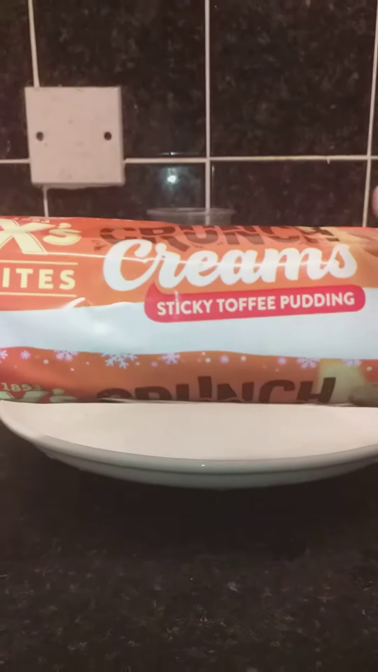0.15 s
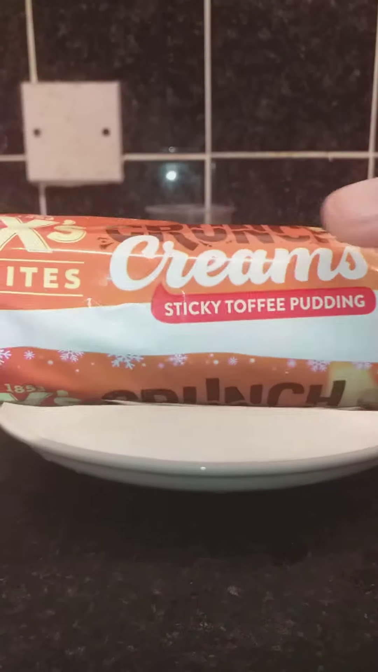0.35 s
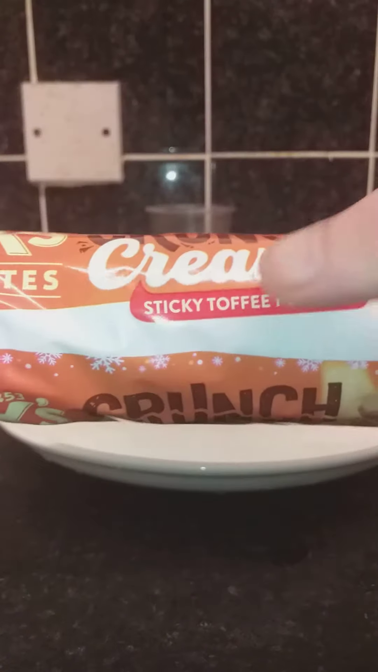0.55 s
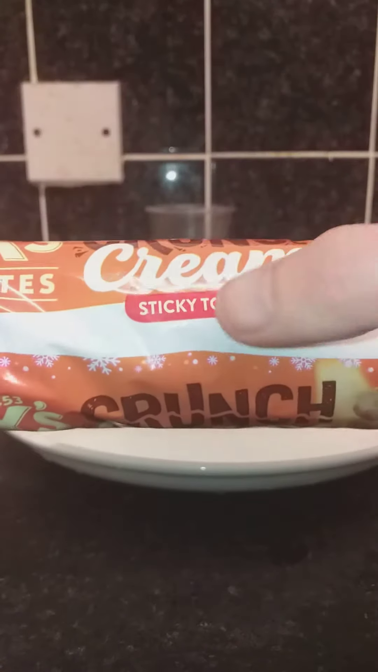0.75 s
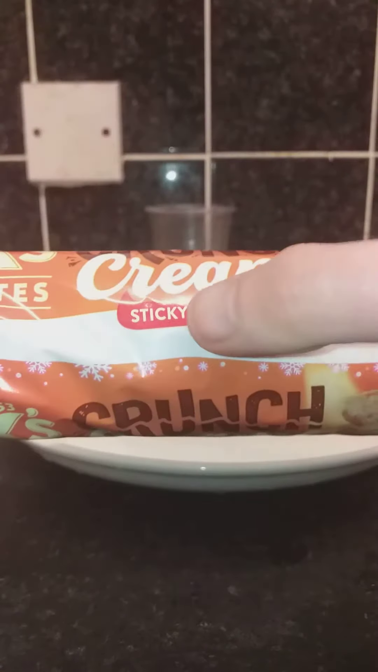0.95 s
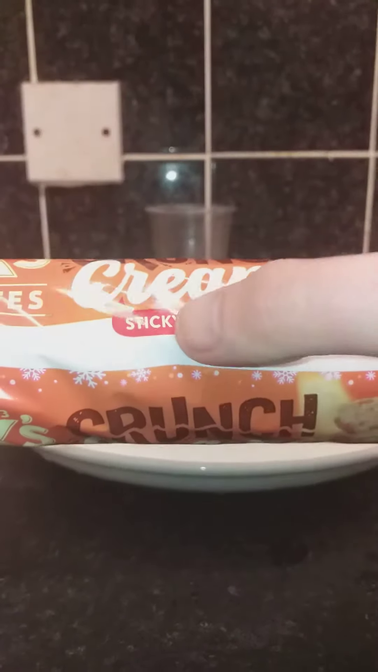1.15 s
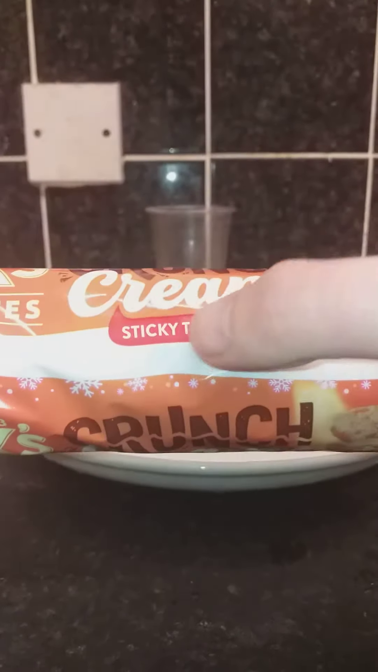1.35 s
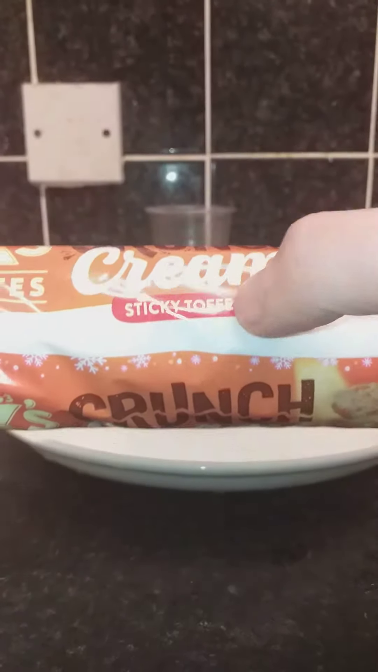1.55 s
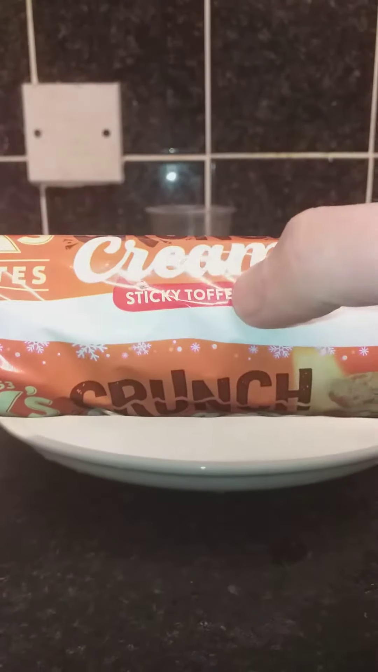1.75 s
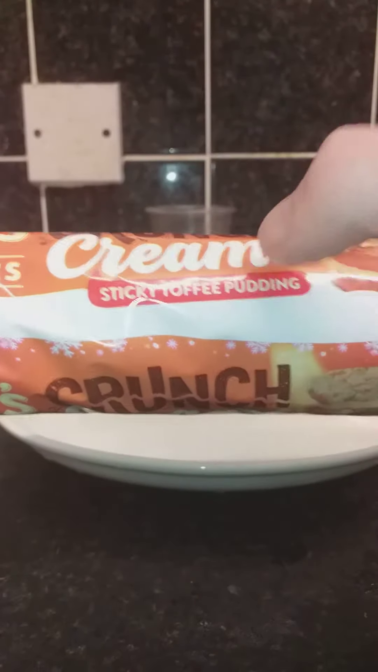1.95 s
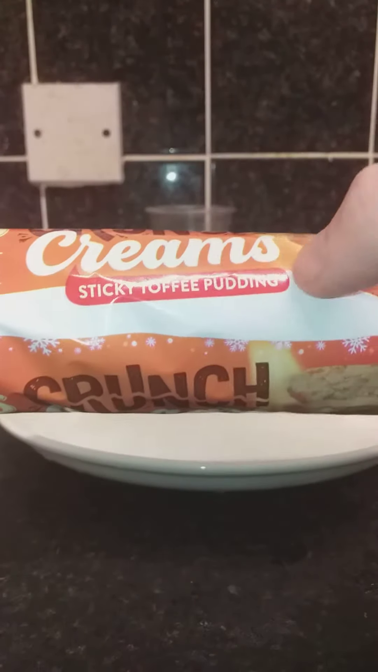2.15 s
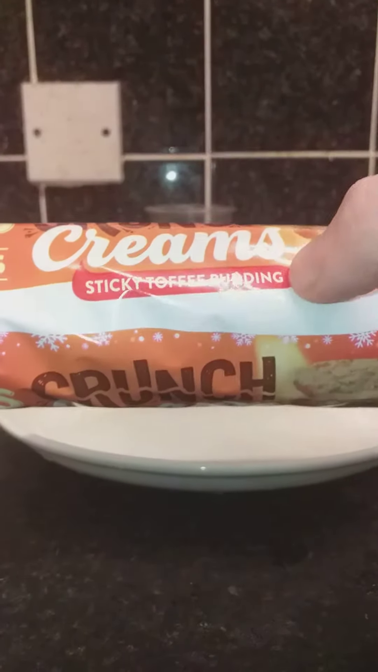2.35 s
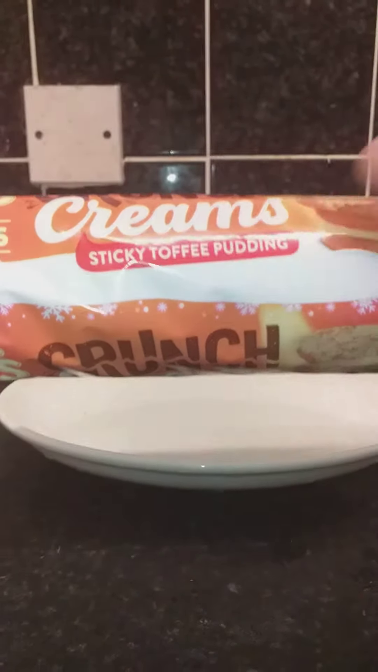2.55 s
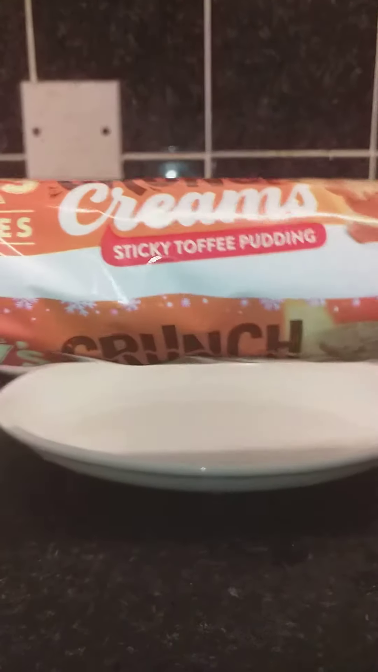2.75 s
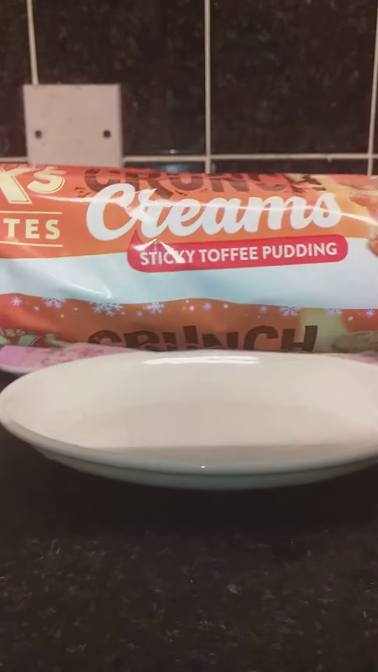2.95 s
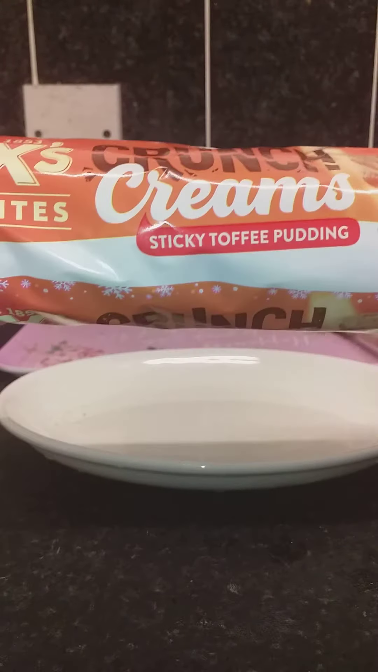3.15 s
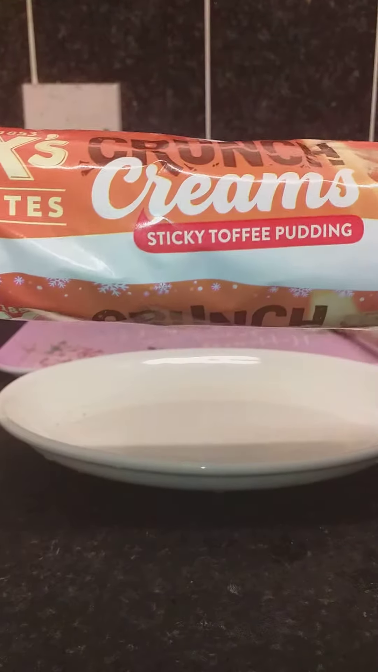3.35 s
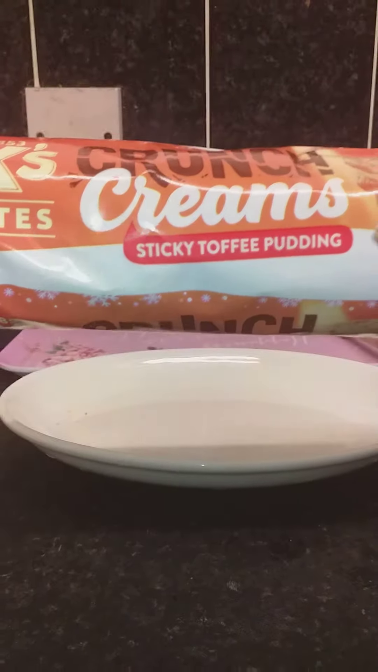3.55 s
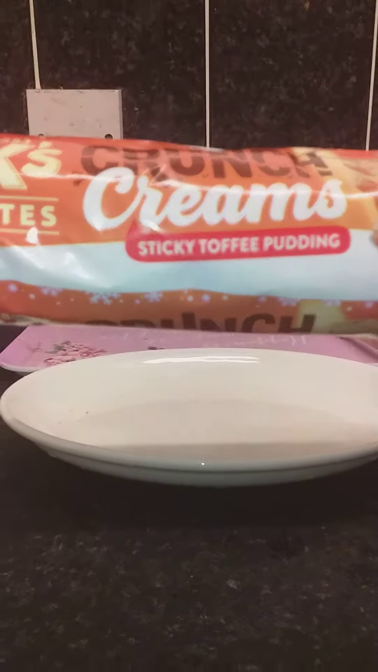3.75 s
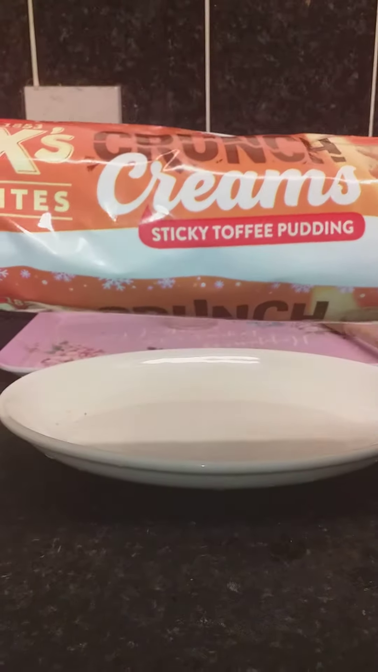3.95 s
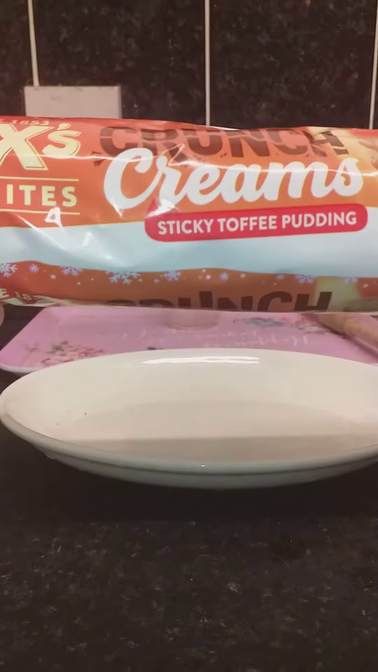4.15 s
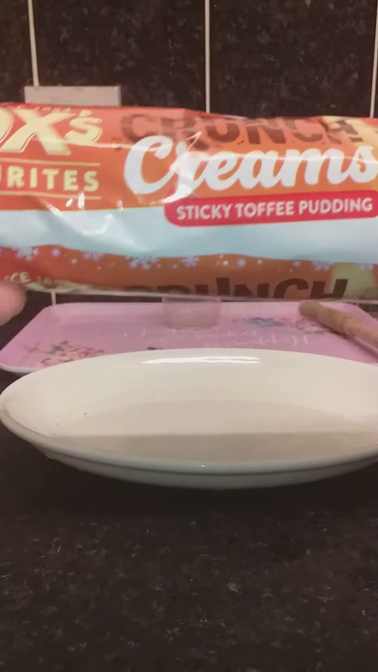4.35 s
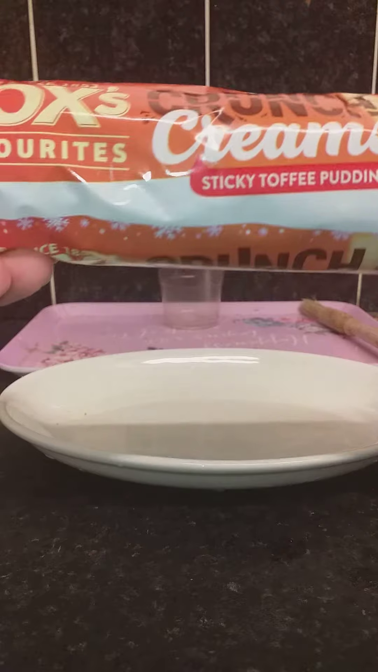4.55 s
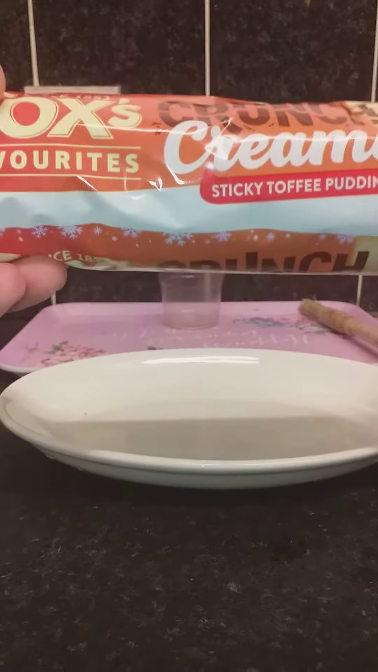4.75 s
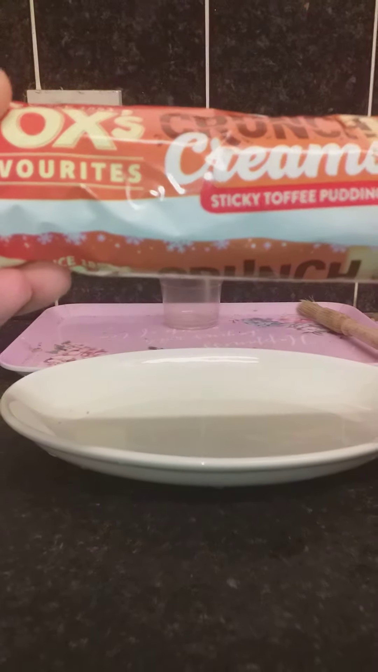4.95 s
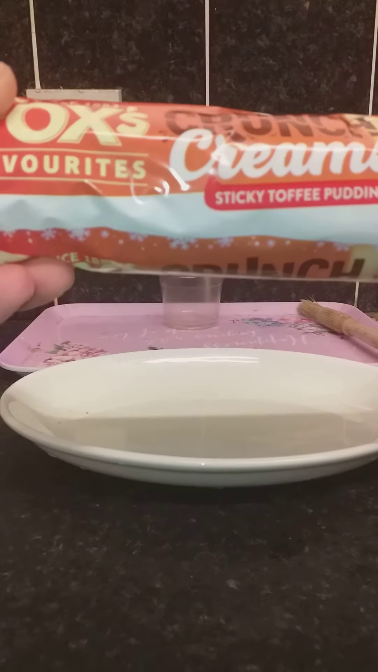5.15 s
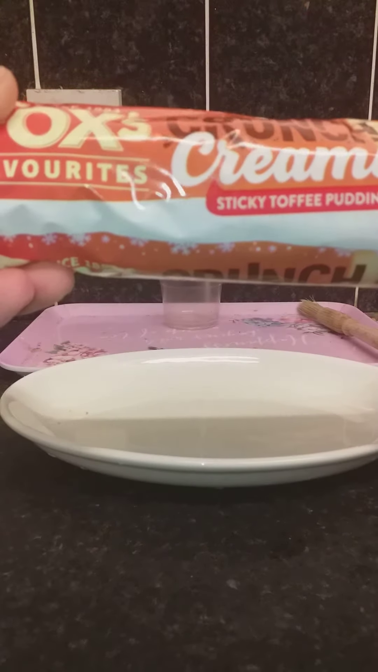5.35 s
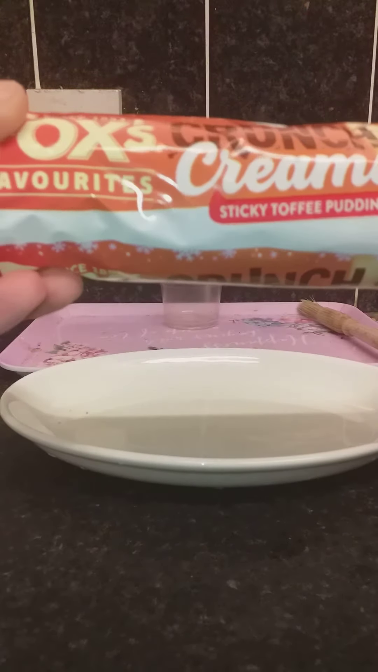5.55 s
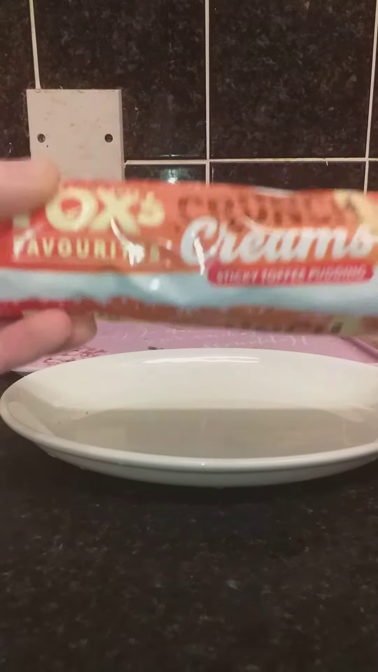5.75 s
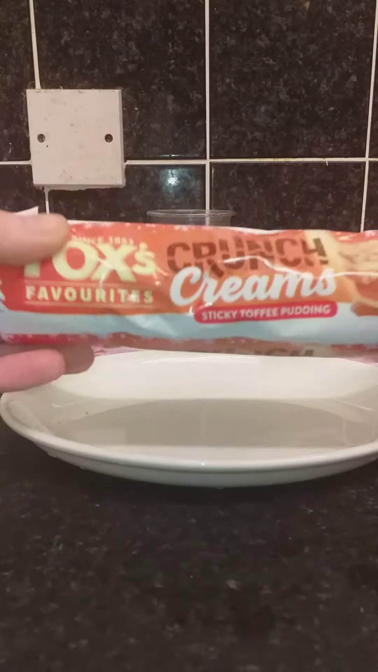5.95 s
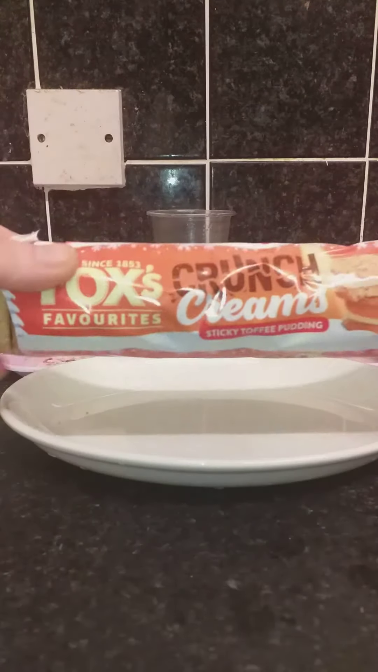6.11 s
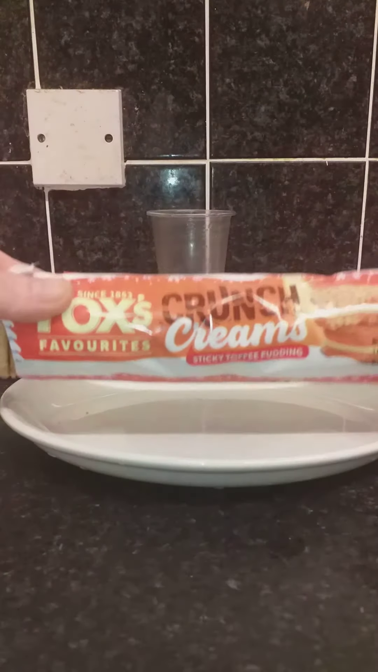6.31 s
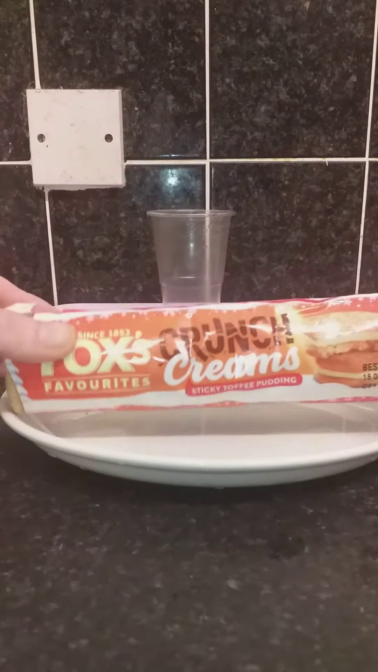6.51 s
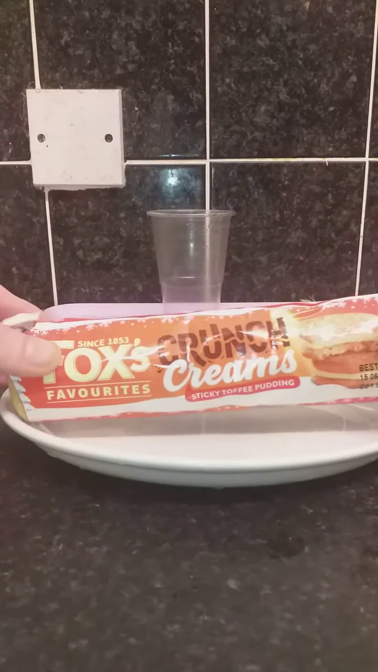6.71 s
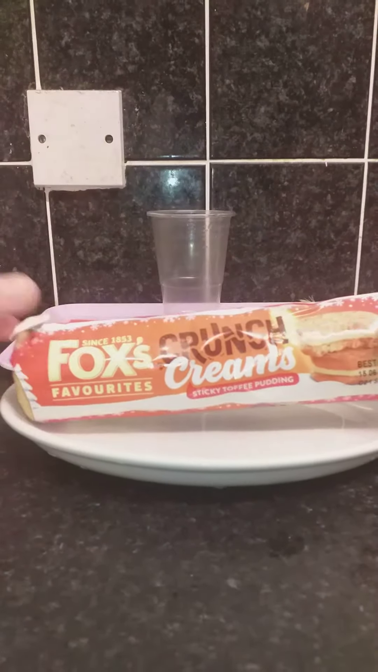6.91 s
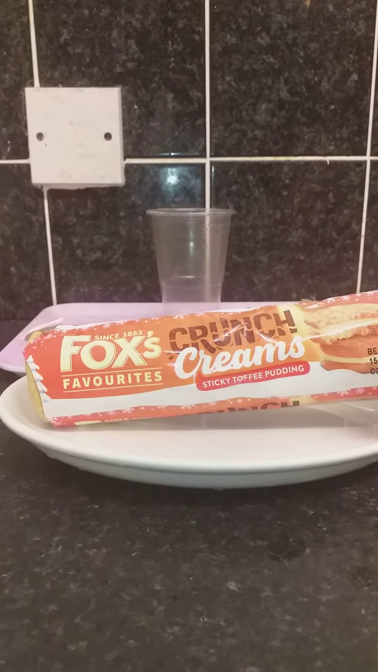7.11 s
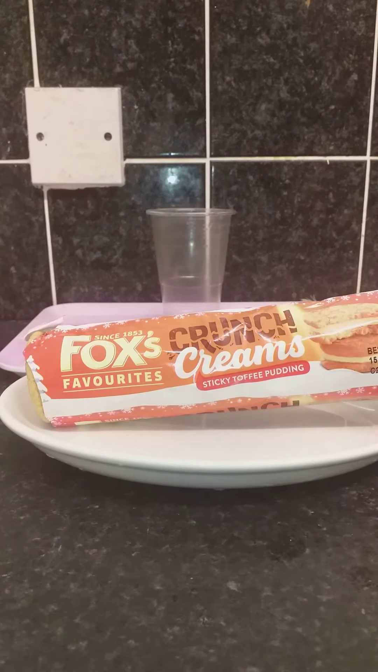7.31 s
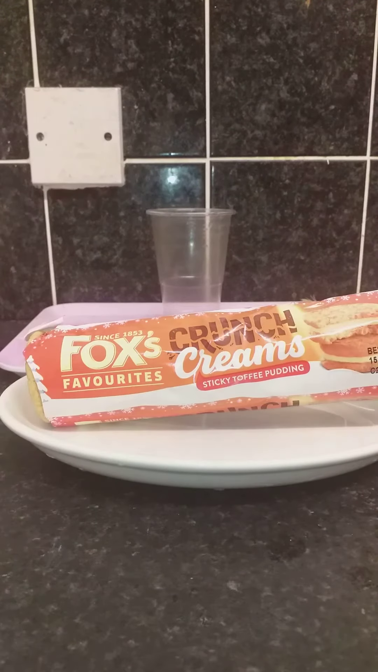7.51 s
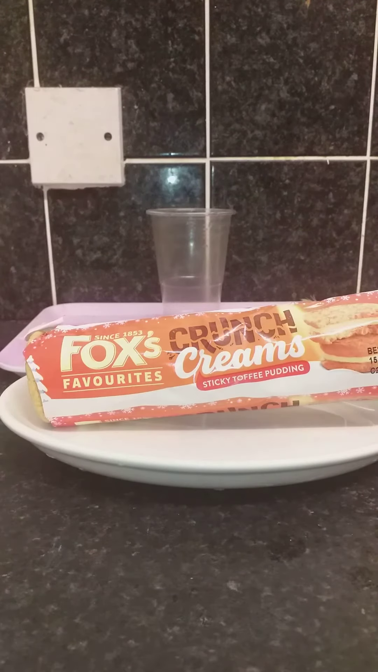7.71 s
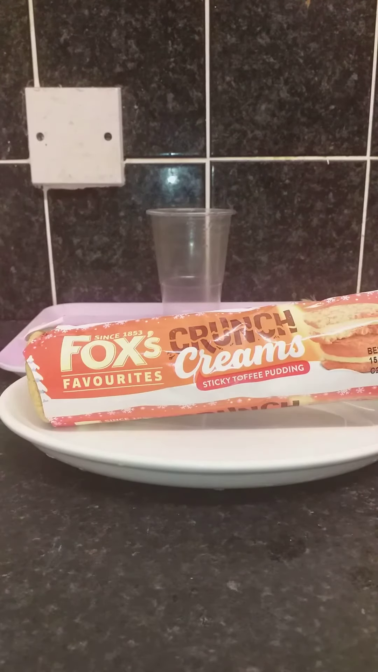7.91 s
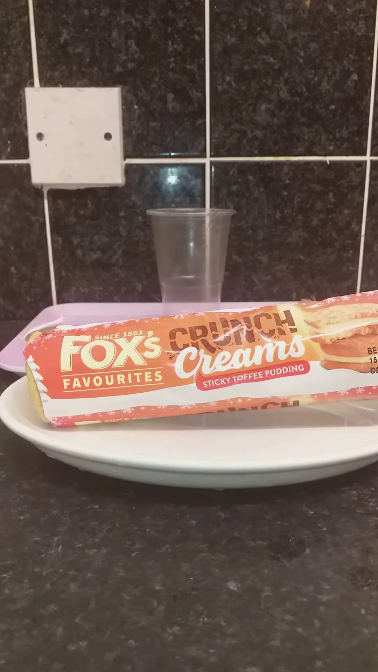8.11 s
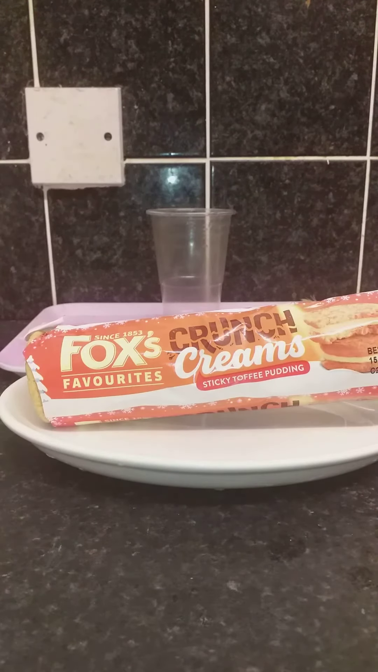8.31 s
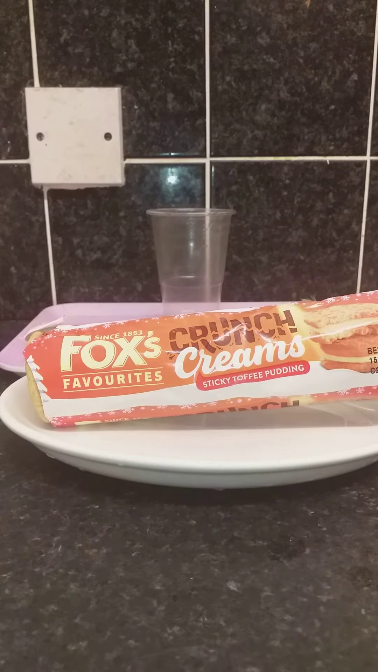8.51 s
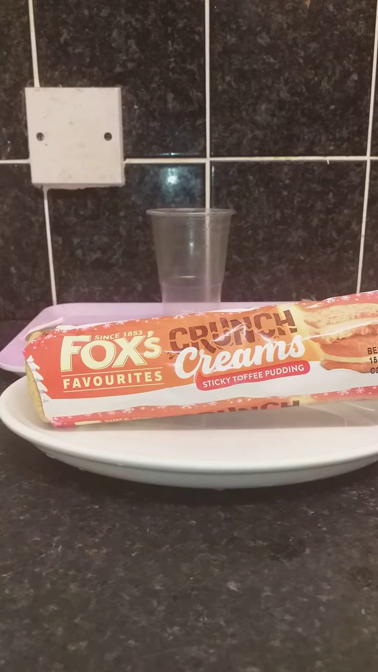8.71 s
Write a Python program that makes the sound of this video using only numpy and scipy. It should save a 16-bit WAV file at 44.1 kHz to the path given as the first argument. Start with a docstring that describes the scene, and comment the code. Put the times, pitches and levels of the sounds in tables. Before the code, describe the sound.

Irregular bursts of bright, snappy wrapper crinkling over a quiet steady motor hum. Isolated creases pop between near-silent gaps, with one tiny thin squeak; later the film crackles thickly and soft low knocks mark the packet landing on a plate. A short hard-walled room ring follows the snaps. The end is almost only hum.

```python
"""In a small tiled kitchen, a thin plastic packet is handled near a phone while an appliance hums.
Each crease of the film snaps over in a short click: film ring, lower packet thud and treble tick.
Wisps of noise crackle between the snaps; soft knocks are pairs of low rings; one thin squeak is a sine.
The tiles ring on as a fading noise tail. The hum is three motor tones over filtered air noise."""
import sys
import numpy as np
from scipy import signal
from scipy.fft import rfft, irfft
from scipy.io import wavfile
from scipy.ndimage import uniform_filter1d

SR = 44100
rng = np.random.default_rng(int(sys.argv[2]) if len(sys.argv) > 2 else 0)


def transcribe(signal):
    """Save signal, clipped to [-1, 1], as a 16-bit WAV file at the path in sys.argv[1]."""
    frames = np.atleast_2d(signal).T
    limited = np.clip(frames, -1, 1)
    pcm = np.round(limited * 32767).astype(np.int16)
    wavfile.write(sys.argv[1], SR, pcm)


N = 391151

# background level, heard to dip and recover slowly: (time [s], relative level [dB])
BACKGROUND_LEVEL = [(0.0, -53.5), (0.62, -59.5), (1.06, -58), (1.7, -53), (2.25, -53.5), (2.47, -51),
                    (2.76, -50.5), (3.33, -54.5), (5.04, -50), (6.91, -52), (7.09, -50), (7.58, -51.5),
                    (8.05, -51.5), (8.87, -49)]
# motor tones in the drone: (frequency [Hz], relative level [dB])
MOTOR_TONES = [(70, -19.5), (100, -6), (129.2, 0)]
# colour of the air noise: (frequency [Hz], relative level per Hz [dB])
AIR_COLOUR = [(24, -45), (45, -22), (80, -17), (150, -10.5), (240, -19), (560, -17), (1300, -9.5),
              (2200, -13.5), (2900, -17.5), (6000, -18), (7200, -38.5), (8800, -54), (11500, -42),
              (16000, -40.5)]
# resonances of the room in the air noise: (centre [Hz], width [Hz], height [dB])
AIR_RESONANCES = [(298, 16.6, 12.5), (366.8, 55, 12.5), (707.3, 15, 11), (752.6, 13.3, 12.5), (1250, 51, 8),
                  (1720, 22, 8), (2133, 25, 8)]
# handling of the film, one curve per spell: (time [s], firmness [dB])
HANDLING_SPELLS = [
    [(0.0, -35.5), (0.114, -49), (0.2, -50)],
    [(0.3, -48), (0.37, -43), (0.44, -53), (0.592, -53), (0.7, -79)],
    [(1.05, -70), (1.146, -39.5), (1.286, -61), (1.6, -61)],
    [(2.1, -70), (2.226, -59), (2.614, -54), (2.76, -44), (2.822, -41.5), (3.022, -52.5), (3.3, -57)],
    [(3.5, -60.5), (3.8, -86)],
    [(4.1, -62), (4.4, -59)],
    [(5.46, -34.5), (5.52, -39), (5.658, -37.5), (5.76, -30), (5.86, -36), (5.98, -31), (6.1, -41.5),
     (6.26, -51)],
    [(6.35, -38), (6.44, -37.5), (6.53, -25.5), (6.62, -42), (6.75, -46), (6.8, -54), (6.88, -45),
     (6.98, -32), (7.03, -42), (7.12, -42), (7.25, -49)],
    [(7.78, -46.5), (8.0, -57)],
]
# colour of the fine crackle: (frequency [Hz], relative level per Hz [dB])
CRACKLE_COLOUR = [(200, -21), (400, -14.5), (1200, 0), (2600, -1), (4000, -2.5), (5800, 0), (7200, -12),
                  (8800, -27.5), (11000, -16), (15500, -25)]
# the distinct creases, plus a few quieter repeats that the walls return some ms after a loud click: (time [s],
# relative peak [dB], film ring [Hz], packet ring [Hz], # packet relative to film [dB], treble tick relative to
# film [dB])
DISTINCT_CREASES = [(0.0254, -2.5, 5100, 2280, -50, -31), (0.0434, -14.5, 4870, 1370, -30, -12),
                    (0.0524, -16, 5630, 1360, -26, -13), (0.0785, -12.5, 5500, 1090, -20, -17),
                    (0.0905, -11, 3750, 2290, -6.5, -15), (0.3044, -39, 4200, 1780, -4, -7),
                    (0.3138, -17.5, 4230, 1110, -10, -11), (0.33, -30, 5430, 746, -11, -14),
                    (0.3421, -24, 5830, 2300, -19, -15), (0.351, -30, 5660, 1770, -6, -4),
                    (0.4137, -26, 3560, 816, -11, -28), (0.426, -26.5, 4010, 2300, -3, -18),
                    (0.4345, -16.5, 3850, 900, -11, -17), (0.4781, -26, 4220, 2250, -2.5, -22),
                    (0.5027, -27, 5200, 1200, -22, -9), (0.5423, -25.5, 4270, 1410, -14, -29),
                    (1.1019, -28.5, 5500, 700, -11, -14), (1.1248, -11, 5330, 1800, -14.5, -8),
                    (1.128, -20, 5330, 2260, -13, -26), (1.1337, -24, 4190, 974, -7, -19),
                    (1.1466, -17.5, 4110, 1390, -10.5, -27), (1.1574, -30, 4700, 799, -14, -31),
                    (1.2156, -35, 5290, 1890, -11, -31), (1.2418, -19.5, 4050, 1430, -15.5, -45),
                    (1.295, -32, 3810, 633, -5.5, -24), (1.3157, -12.5, 5660, 1400, -8.5, -42),
                    (1.4183, -24, 3900, 670, 2, -39), (1.4248, -31, 3910, 1870, -3, -29),
                    (1.4565, -34, 4290, 1270, -11, -25), (1.5185, -25, 4180, 1260, -7.5, -31),
                    (1.6003, -30, 5700, 1180, -12, -29), (1.8365, -28.5, 3930, 1140, -4, -32),
                    (2.2102, -16, 5000, 1540, -14.5, -24), (2.4046, -28.5, 5060, 743, -5, -40),
                    (2.6005, -26, 5400, 1150, -25, -27), (2.6244, -26, 5270, 697, -16, -11),
                    (2.6672, -16, 4880, 1850, -30, -34), (2.6756, -19, 3650, 2190, -21, -24),
                    (2.6926, -7, 5400, 1740, -26, -19.5), (2.7646, -21.5, 5590, 1250, -23, -18),
                    (2.7778, -19, 3860, 1260, -24, -8), (2.8689, 1.5, 5340, 1850, -19, -13.5),
                    (2.878, -16.5, 4600, 1980, -13, -25), (2.8864, -20, 4800, 1700, -20, -28),
                    (3.0917, -33, 5980, 1250, -9, -29), (3.2148, -24, 5300, 1200, -8, -20),
                    (3.5459, -11, 3970, 800, -13, -24), (3.5669, -17, 4370, 710, -10.5, -35),
                    (3.5974, -25.5, 5370, 710, -2, -36), (3.658, -15, 3540, 980, -7.5, -52),
                    (4.151, -18, 5140, 1820, -22, -38), (4.171, -10, 4970, 1820, -18.5, -17),
                    (4.3286, -32.5, 3660, 1360, -8, -38), (5.462, -12.5, 3800, 1900, -6.5, -24),
                    (5.4787, -16, 5400, 1270, -10, -31), (5.4984, -22, 3790, 853, -2.5, -33),
                    (5.5436, -9, 3980, 1340, -23, -26), (5.5859, -8.5, 5670, 2020, -36, -12),
                    (5.6184, -13.5, 4020, 810, -15, -38), (5.6406, -24, 5380, 1410, -18, -31),
                    (5.6695, -25, 4240, 1190, -7, -29), (5.696, -26.5, 5300, 1590, 4, -18),
                    (5.7288, -3.5, 4060, 2060, -10, -10), (5.7429, -6.5, 4000, 1700, -17, -33),
                    (5.7555, -12, 4350, 2230, -7.5, -25), (5.7767, -17, 5410, 1240, -11, -29),
                    (5.7922, -23, 3850, 824, -14, -31), (5.8102, -11, 3960, 730, -11, -28),
                    (5.84, -19, 5300, 2150, -24, -29), (5.8461, -5, 3970, 1140, -16, -37),
                    (5.8784, -26, 3700, 1100, -21, -25), (5.9063, -11, 4030, 1210, -14, -7),
                    (5.9176, -5, 4430, 1670, -17, -14), (5.9334, -23, 5010, 1700, -9, -24),
                    (5.9458, -10, 4150, 1670, -8, -34), (5.9602, -12.5, 4300, 1040, -21, -21),
                    (5.978, -16, 5630, 2150, -27, -13), (5.997, -19.5, 4010, 2240, -24, -5),
                    (6.0347, -5, 3700, 1740, -13.5, -16.5), (6.0566, -18, 3800, 1720, -13, -25),
                    (6.0804, -24, 4930, 1280, -17, -23), (6.1525, -19, 4200, 1390, -19, -14),
                    (6.2038, -7.5, 5550, 1410, -28, -11), (6.2532, -25.5, 4430, 756, -4, -32),
                    (6.3445, -29, 6000, 1220, -22, -29), (6.3565, -17, 4170, 1840, -13, -28),
                    (6.3614, -7, 3750, 1900, -12.5, -21), (6.3789, 0.5, 4070, 1830, -16.5, -11),
                    (6.415, -5.5, 4460, 2240, -32, -9), (6.4587, -19, 5150, 1170, -21, -27),
                    (6.478, -17, 5440, 1430, -21, -28), (6.4883, -15.5, 4440, 1440, -21, -25),
                    (6.5194, -16, 4480, 1880, -20, -23), (6.5309, -9, 5400, 1140, -15, -7),
                    (6.5438, -8, 4540, 1710, -22, -10), (6.572, -17, 5220, 1140, -11, -30),
                    (6.6713, -24.5, 4500, 1410, -21, -8), (6.7047, -14.5, 5170, 760, -18, -33),
                    (6.731, -20, 4440, 1400, -3, -27), (6.8186, -10.5, 4060, 1700, -17, -43),
                    (6.8448, -21, 4210, 1250, -14, -40), (6.8847, -24, 3400, 1890, -5, -34),
                    (6.9089, -7.5, 4370, 1340, -25, -13), (6.9143, -9.5, 5870, 1850, -14.5, -3),
                    (6.9372, -12, 5730, 1980, -20, -17), (6.9684, -12.5, 4340, 1930, -23, -1),
                    (6.9727, -8.5, 4500, 1430, -20, -14), (6.9769, -6, 4580, 1440, -13, -22),
                    (7.0515, -16.5, 5550, 1870, -9.5, -13), (7.0718, -24, 4580, 1430, -8, -6),
                    (7.1104, -14.5, 5740, 1880, -28, -12), (7.1478, -5, 4670, 1380, -39, -12),
                    (7.8026, -29, 3770, 900, -7, -35)]
# bands that film, packet and edge radiate: (from [Hz], to [Hz], filter order)
RADIATED_BANDS = [(2300, 7100, 5), (280, 2700, 1), (9600, 18000, 3)]
# soft knocks of the full packet in the hand and on the dish:
# (time [s], relative level [dB], low ring [Hz], high ring [Hz])
KNOCKS = [(.578, -43, 620, 940), (4.328, -37.5, 433, 684), (6.485, -37, 210, 452), (6.547, -38, 190, 327.5),
          (6.969, -36, 231, 437), (7.804, -37.5, 119, 389), (7.818, -36.5, 330, 900)]
# the one thin squeak: (start [s], end [s], frequency [Hz], relative level [dB])
SQUEAK_TONE = (2.73, 2.805, 1255, -40)
# the room's fading tail: (frequency [Hz], time to fall 60 dB [s], relative level [dB])
ROOM_TAIL = [(500, 0.52, -2), (1510, 0.13, -4), (4000, 0.28, -1), (8000, 0.27, 0), (16000, 0.15, 7.5)]

CRACKLE_DB = -5.5  # fine crackle relative to the handling
# lesser creases come at random, each with its own rings and colour
LESSER_PER_S = 45
FIRM_DB = -35  # level of firm handling
# relative peak under firm handling; dB per dB of handling; random spread up or down
LESSER_DB, LESSER_SLOPE, LESSER_SPREAD_DB = -28, 1.14, 8
FILM_HZ, PACKET_HZ = (4060, 5940), (1060, 2160)  # ranges of their rings
PACKET_DB, TICK_DB, COLOUR_SPREAD_DB = -5.5, -8.5, 3.5  # relative to the film; random spread
TOP_HZ = 15800  # the phone passes almost nothing above this


def undb(db):
    """Turn decibels into a plain factor."""
    return 10 ** (np.asarray(db) / 20)


def curve(rows):
    """Join (time, value) points by straight lines, one value per sample."""
    times, values = np.transpose(rows)
    return np.interp(np.arange(N) / SR, times, values)


def unit(x):
    """Scale a sound to an average (RMS) strength of 1."""
    return x / np.sqrt(np.mean(x ** 2))


def colour(x, points, peaks=()):
    """Filter with the gain of (Hz, dB) points plus resonant humps, responding only after its input."""
    size = 8192
    f = np.arange(size // 2 + 1) * SR / size + 1  # the 1 avoids log(0)
    hz, db = np.transpose(points)
    gain_db = np.interp(np.log(f), np.log(hz), db)
    for centre, width, height in peaks:
        gain_db = gain_db + height / (1 + (2 * (f - centre) / width) ** 2)
    # folding the cepstrum (spectrum of the log gain) gives the filter minimum phase
    cepstrum = irfft(gain_db * np.log(10) / 20)
    cepstrum[1:size // 2] *= 2
    cepstrum[size // 2 + 1:] = 0
    response = irfft(np.exp(rfft(cepstrum)))
    return signal.fftconvolve(x, response)[:len(x)]


def walk(rate):
    """Wander between random levels, a new one every 1 / rate seconds, joined by straight ramps."""
    hold = int(SR / rate)
    levels = rng.standard_normal(N // hold + 1)
    return uniform_filter1d(np.repeat(levels, hold), hold)[:N]


def burst(t, rise, t60):
    """Envelope that climbs for a moment and dies away, with its top at 1."""
    envelope = (1 - np.exp(-t / rise)) ** 2 * np.exp(-np.log(1000) * t / t60)
    return envelope / envelope.max()


def drone():
    """Motor tones of gently wandering level lie over air noise coloured by the room's resonances."""
    t = np.arange(N) / SR
    tones = 0
    for hz, db in MOTOR_TONES:
        level = undb(db + 0.31 * walk(0.56))
        tones = tones + level * np.sin(2 * np.pi * (hz * t + rng.random()))
    air = unit(colour(rng.standard_normal(N), AIR_COLOUR, AIR_RESONANCES))
    air = air * undb(0.76 * walk(2.928))
    return undb(curve(BACKGROUND_LEVEL)) * (undb(1.5) * tones + undb(5.5) * air)


def handling():
    """Firmness of the handling in dB, dropping to -90 between the spells."""
    padded = []
    for spell in HANDLING_SPELLS:
        padded += [(spell[0][0] - .03, -90), *spell, (spell[-1][0] + 0.029, -90)]
    return curve(padded)


def crackle():
    """Many small creases at random moments, a few larger than the rest, each a wisp of noise."""
    when = rng.random(N) < 900 / SR  # about 900 per second
    sizes = when * undb(3.8 * np.minimum(rng.exponential(size=N), 4))
    wisp = burst(np.arange(256) / SR, .0001, 0.004)
    wisps = signal.fftconvolve(sizes, wisp)[:N] * rng.standard_normal(N)
    return unit(colour(wisps, CRACKLE_COLOUR)) * undb(handling() + CRACKLE_DB)


def creases():
    """List the distinct creases, then lesser ones whose strength follows the handling at their moment."""
    count = int(LESSER_PER_S * N / SR)
    when, size, film, packet, body, edge = rng.random((count, 6)).T
    sample = when * (N - 1)
    firmness = handling()[sample.astype(int)] - FIRM_DB
    db = LESSER_DB + LESSER_SLOPE * firmness + LESSER_SPREAD_DB * (2 * size - 1)
    film_hz = np.interp(film, [0, 1], FILM_HZ)
    packet_hz = np.interp(packet, [0, 1], PACKET_HZ)
    packet_db = PACKET_DB + COLOUR_SPREAD_DB * (2 * body - 1)
    tick_db = TICK_DB + COLOUR_SPREAD_DB * (2 * edge - 1)
    lesser = np.c_[sample / SR, db, film_hz, packet_hz, packet_db, tick_db]
    return np.vstack([DISTINCT_CREASES, lesser])


def snaps():
    """A crease flips: the taut film rings briefly, the packet thuds lower, the edge ticks in the treble."""
    t = np.arange(1024) / SR
    s, db, film_hz, packet_hz, packet_db, tick_db = creases().T[:, :, None]
    hiss, rustle, tick = rng.standard_normal((len(s), 3, 1024)).transpose(1, 0, 2)
    flip = burst(t, .00002, .00025)  # the sudden step of the crease
    film = np.sin(2 * np.pi * film_hz * t) * burst(t, .0001, 0.003)
    film = film + 0.67 * flip + 0.34 * hiss * burst(t, 0.00013, 0.0057)
    film += 0.46 * rustle * burst(t, 0.00024, 0.012)  # neighbouring wrinkles settle after
    thud = np.sin(2 * np.pi * packet_hz * t) * np.exp(-packet_hz * t / .9)  # nearly dead in two cycles
    packet = thud + 0.35 * rustle * burst(t, 0.00055, 0.033)
    edge = flip + 0.3 * tick * burst(t, 0.0002, 0.0035)
    parts = (film, packet, edge)
    levels = (db, db + packet_db, db + tick_db)
    click = 0
    for part, part_db, (low, high, order) in zip(parts, levels, RADIATED_BANDS):
        band = signal.butter(order, [low, high], "band", fs=SR, output="sos")
        part = signal.sosfilt(band, part)
        click = click + undb(part_db) * part / np.abs(part).max(axis=1, keepdims=True)
    # the phone's microphone has a dip near 8.8 kHz, applied here to the clicks
    notched = signal.lfilter(*signal.iirnotch(8800, 2.5, SR), click)
    click = 0.38 * click + 0.55 * notched
    out = np.zeros(N + 2048)
    start = (s * SR).astype(int) + 20  # 20 samples after the listed time
    np.add.at(out, start + np.arange(1024), click)
    return out[:N]


def bump():
    """The full packet lands softly: two damped low rings."""
    out = 0
    for s, db, low_hz, high_hz in KNOCKS:
        t = np.maximum(np.arange(N) / SR - s, 0)
        rings = np.sin(2 * np.pi * low_hz * t) + .7 * np.sin(2 * np.pi * high_hz * t)
        out = out + undb(db) * rings * burst(t, .001, 10 / low_hz)
    return out


def squeak():
    """A thin steady tone sounds for a moment."""
    start, end, hz, db = SQUEAK_TONE
    t = np.arange(N) / SR
    fade = np.interp(t, [start, start + .015, end - .015, end], [0, 1, 1, 0])
    return undb(db) * fade * np.sin(2 * np.pi * hz * t)


def kitchen(x):
    """The tiles ring on: a diffuse noise tail that dies at its own pace in each octave."""
    t = np.arange(SR // 2) / SR
    hz, t60, db = np.transpose(ROOM_TAIL)
    tail = 0
    for f in 250 * 2. ** np.arange(7):
        edges = [f / 2 ** .5, min(f * 2 ** .5, 20000)]
        band = signal.butter(2, edges, "band", fs=SR, output="sos")
        level_db = np.interp(np.log(f), np.log(hz), db)
        fall_s = np.interp(np.log(f), np.log(hz), t60)
        noise = signal.sosfilt(band, rng.standard_normal(len(t)))
        tail = tail + noise * undb(level_db - 60 * t / fall_s)
    tail *= undb(-38) * (1 - np.exp(-(t / 0.0048) ** 2))  # the walls answer after a few ms
    return x + signal.fftconvolve(x, tail)[:N]


def scene():
    """The packet's sounds ring in the kitchen, with the drone added."""
    packet = snaps() + crackle() + bump() + squeak()
    return (kitchen(packet) + drone())[None]


def record(dry):
    """The phone loses the deepest bass, rounds the loudest clicks and cuts the top."""
    bass_cut = signal.butter(2, 55, "high", fs=SR, output="sos")
    thin = signal.sosfilt(bass_cut, dry)
    rounded = np.tanh(0.9 * thin) / 0.82
    top_cut = signal.ellip(10, .3, 75, TOP_HZ, fs=SR, output="sos")
    return signal.sosfilt(top_cut, rounded)


dry = scene()
out = record(dry)
transcribe(out)
```